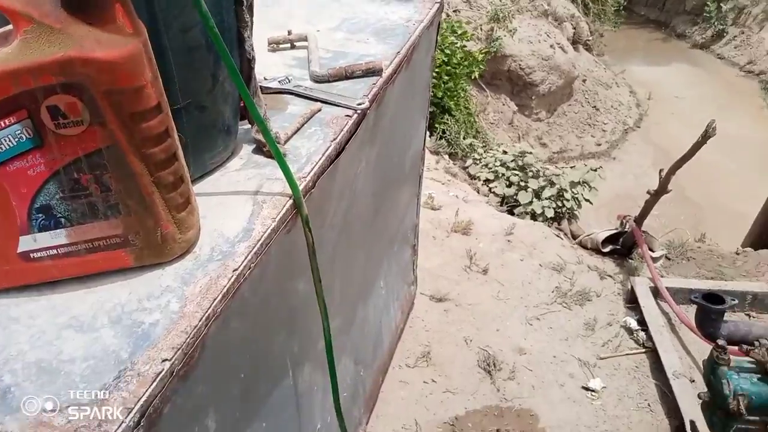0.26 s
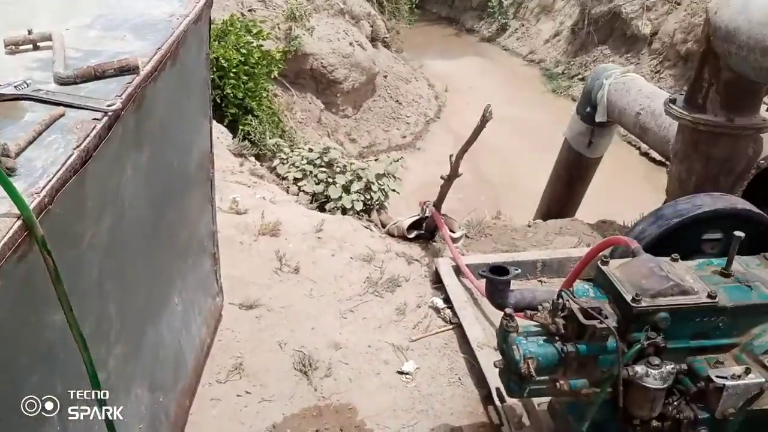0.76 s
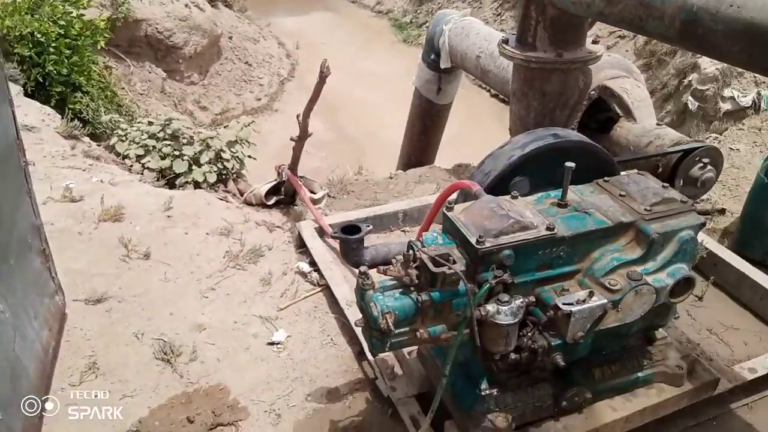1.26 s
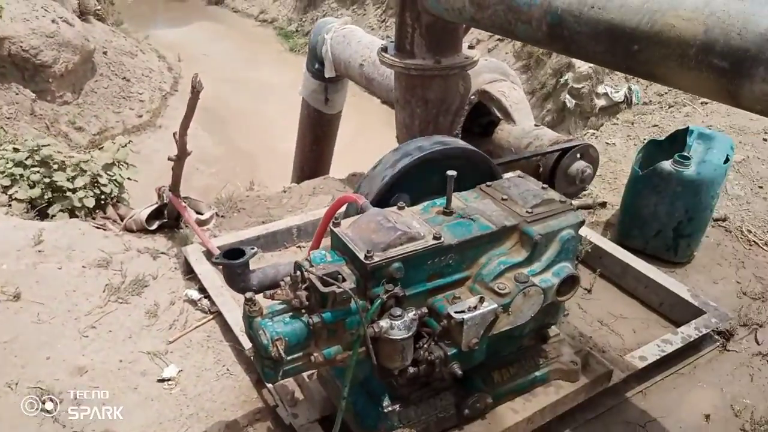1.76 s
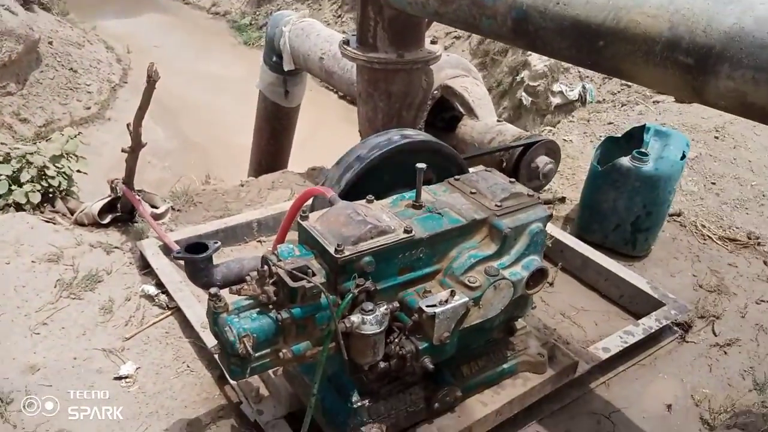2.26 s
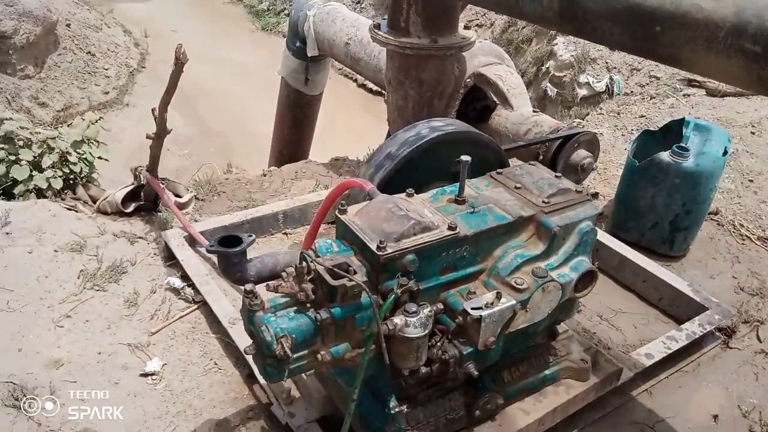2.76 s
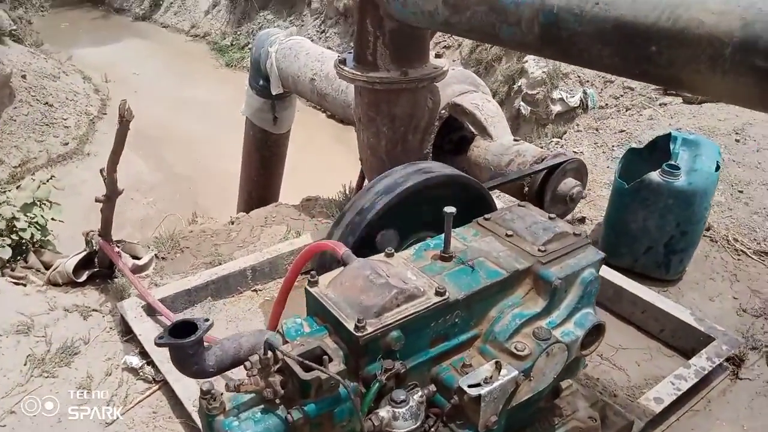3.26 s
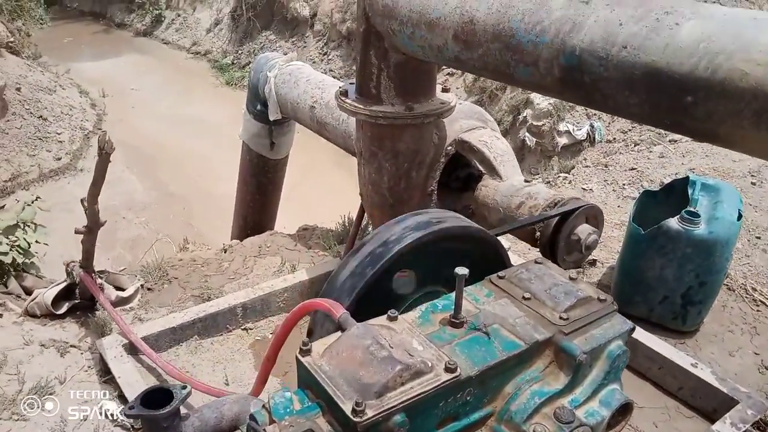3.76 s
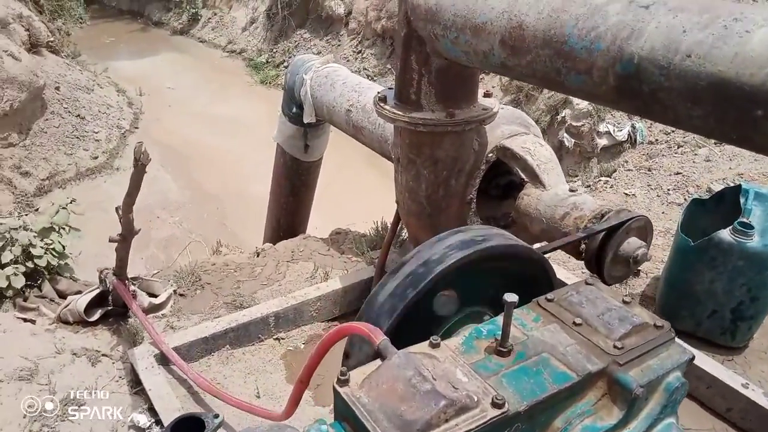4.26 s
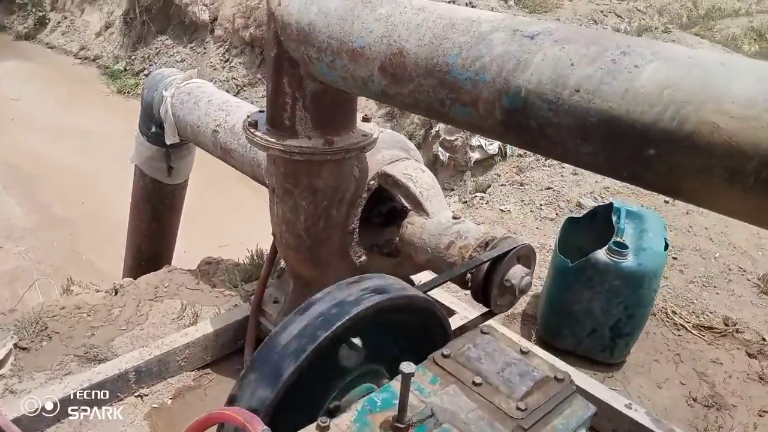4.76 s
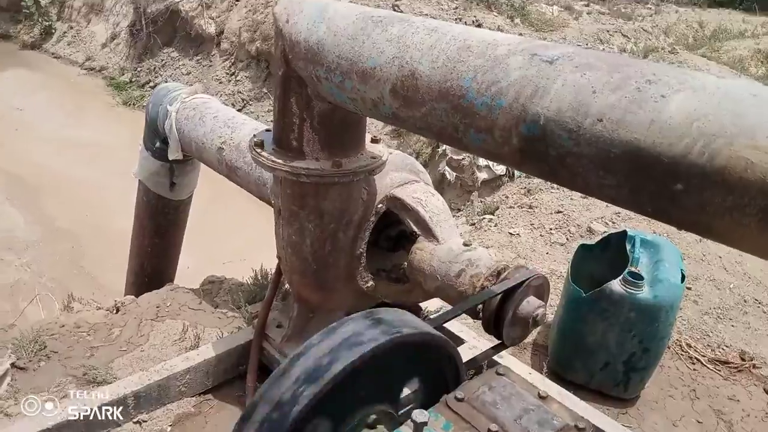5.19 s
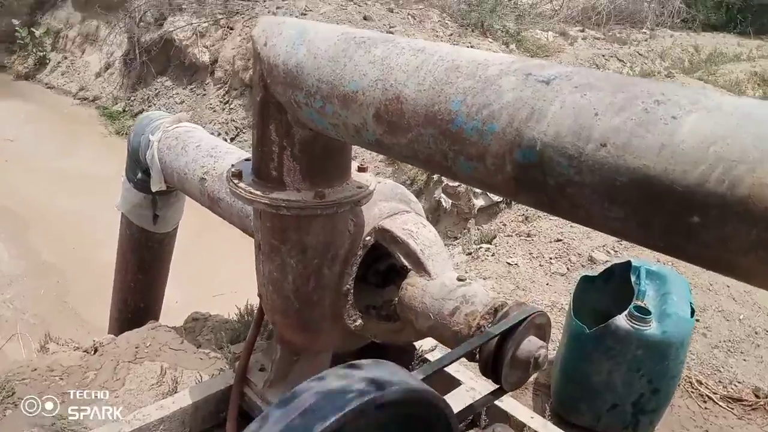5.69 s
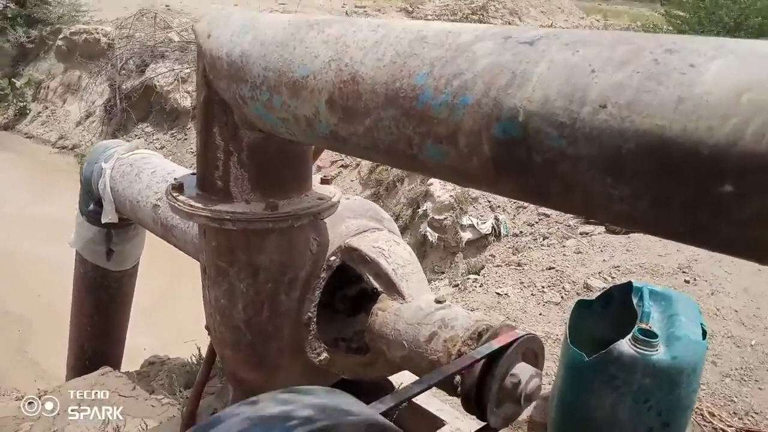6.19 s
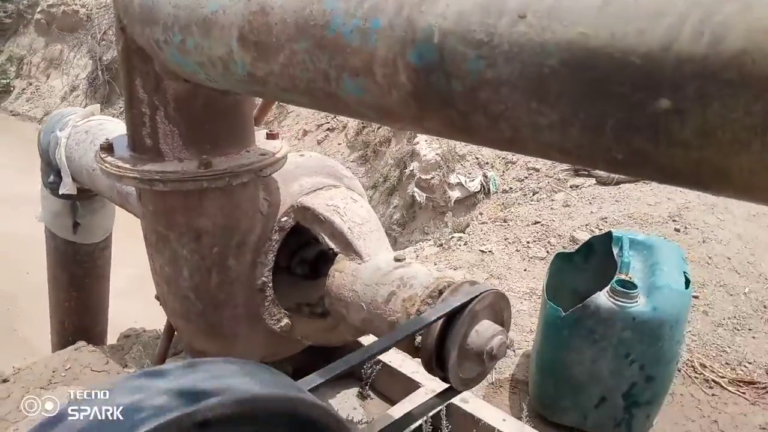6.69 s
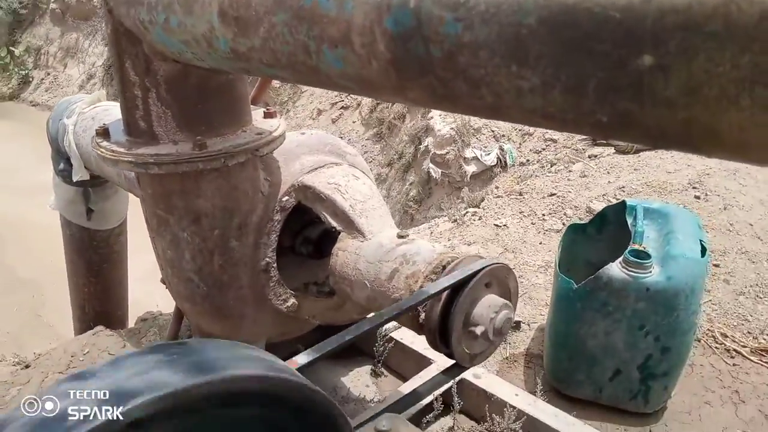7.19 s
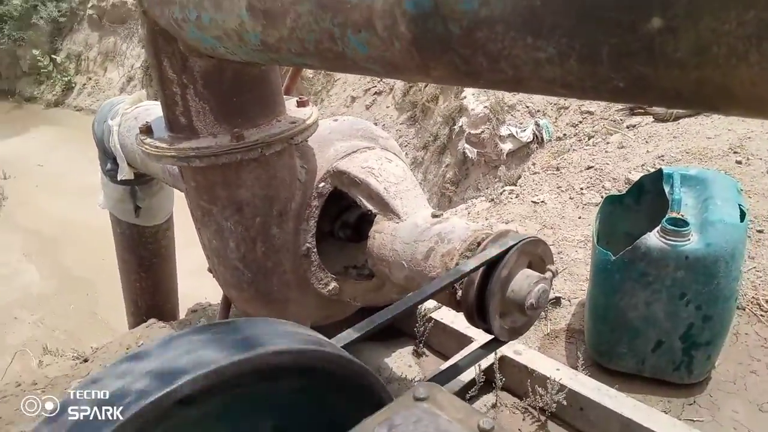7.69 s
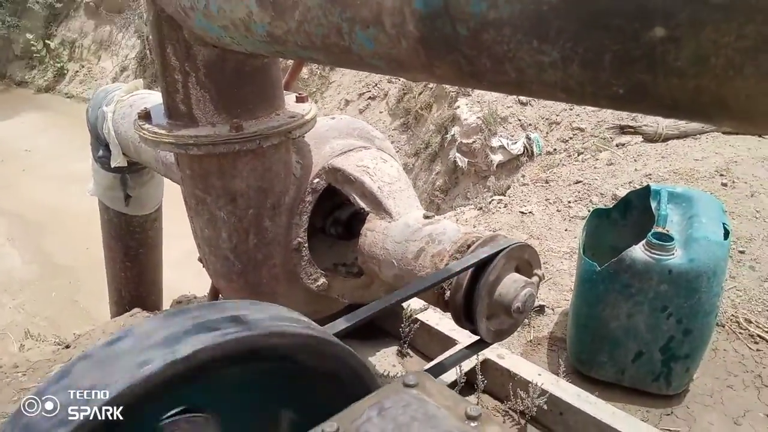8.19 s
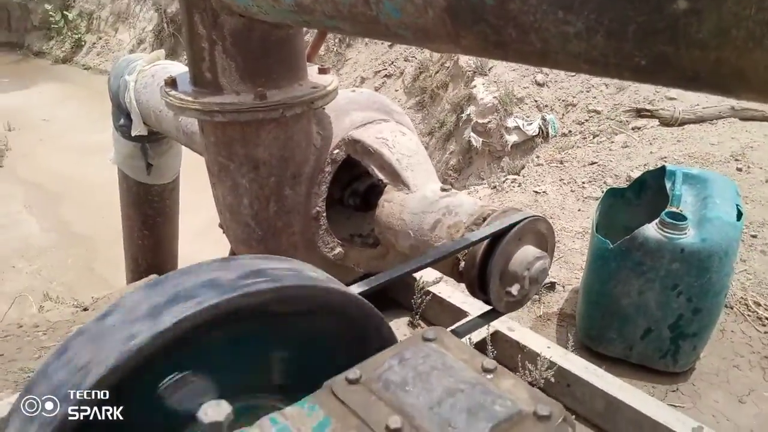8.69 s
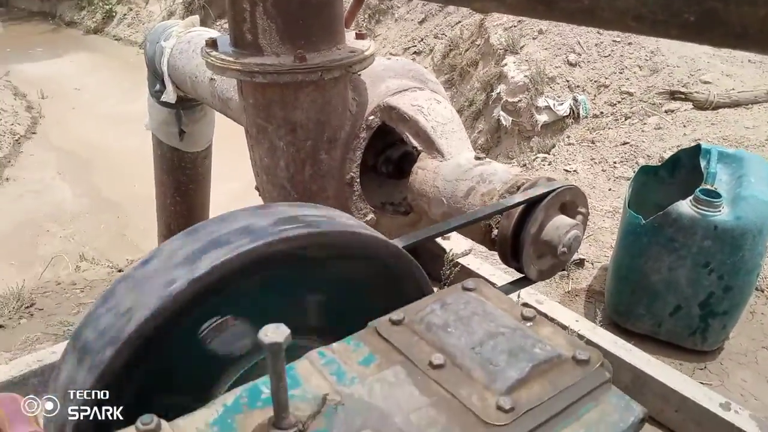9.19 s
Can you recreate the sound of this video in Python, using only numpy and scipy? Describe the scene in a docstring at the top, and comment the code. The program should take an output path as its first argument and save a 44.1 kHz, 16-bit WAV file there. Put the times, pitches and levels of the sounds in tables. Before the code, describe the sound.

From 0 to 9.5 s a single-cylinder diesel runs outdoors at an unchanging nine beats a second, heard close and dry. Every beat is a short burst of rough exhaust noise, often with a chirping whistle of differing pitch, followed within a tenth of a second by a dull knock, a ringing metallic tick and a fainter second tick. Loose sheet metal chatters continuously, surging with each beat. From 0 to 2.4 s it is loud, hissy and harsh, with lumpy wind and small air pops on the microphone. Between 2.4 and 3.3 s it turns away: blasts and rattle drop, treble dulls. Until 7.8 s low soft puffs and woody knocks stand out, with casting rings strongest around 6 s. At 7.9 s there is a low air thump and brief dip; from 8.05 s the bright, sharp blasts and rattle jump back, peaking near 8.25 s, then ease slightly and continue to the end.

```python
"""A single-cylinder diesel beats about nine times a second outdoors throughout, driving a water pump, while
sheet metal rattles; early on, wind brushes the microphone. Each beat is an exhaust blast of shaped noise
with a whistle and a low sine puff, then a knock and ringing tick from struck resonators and a second, noisy
tick. The rattle is dense clicks ringing panels, over noise. The microphone turns away and back, by level curves."""
import sys
import numpy as np
from scipy import signal
from scipy.fft import rfft, irfft, next_fast_len
from scipy.io import wavfile
from scipy.ndimage import uniform_filter1d

SR = 44100
rng = np.random.default_rng(int(sys.argv[2]) if len(sys.argv) > 2 else 0)


def elevation(decibels):
    """Turn decibel levels (scalar or array-like) into linear amplitude ratios."""
    levels = np.asarray(decibels, float)
    return 10 ** (levels / 20)


def transcribe(u):
    """Save the signal u as a 16-bit wav file named by the first command-line argument.

    u: samples, shape (n,) or (channels, n), limited to [-1, 1]; the rate is SR.
    q: integer samples, one column per channel.
    """
    v = np.clip(np.atleast_2d(u).T, -1, 1)
    q = np.round(v * 32767).astype(np.int16)
    wavfile.write(sys.argv[1], SR, q)


N = 416744

# levels as the microphone turns away from the engine and back:
# t/s, blast level/dB, puff level/dB, low rattle level/dB, high rattle level/dB
TURN = [(.1, -12, -34, -45, -30.5), (.45, -9, -43, -49, -31), (.85, -9.5, -33, -47, -31.5),
        (1.45, -8.5, -41, -44.5, -30), (2.25, -9, -36, -47.5, -29.5), (2.45, -12.5, -27.5, -30.5, -32),
        (2.75, -19.5, -37.5, -45, -40), (3.3, -23, -30.5, -43, -42.5), (4.2, -22, -23.5, -45, -43),
        (5.7, -18.5, -25, -44.5, -43), (6.45, -22.5, -23.5, -42, -42.5), (6.65, -27, -24, -43.5, -42.5),
        (7.65, -24.5, -22, -45, -43), (7.959, -33, -21, -49, -42), (8.049, -16, -33, -26.5, -28),
        (8.25, -7, -29, -40, -26), (8.75, -12, -26, -33.5, -32.5), (9.35, -13.5, -34, -32.5, -28.5)]
# treble of the blast: t/s, hiss level/dB, upper hiss level/dB, top hiss level/dB
TREBLE = [(.15, -19, -36, -21.5), (.45, -18, -29, -14.5), (1, -21, -36, -22), (1.6, -27, -23, -21.5),
          (2.2, -26, -24.5, -21.5), (2.9, -36, -32.5, -25), (3.45, -34.5, -29.5, -45),
          (3.9, -36, -37.5, -54), (4.6, -38, -41, -54), (5.5, -35.5, -63.5, -37), (6.3, -38.5, -64, -37),
          (7.2, -34.5, -56, -29.5), (7.85, -37.5, -56, -38), (7.97, -43.5, -64, -27),
          (8.15, -17.5, -35, -13), (8.7, -34, -31, -40), (9.35, -27.5, -26, -40)]
KNOCK_S, TICK_S, LATE_TICK_S = 0.03, 0.058, 0.0829   # delays after the blast


def rms_one(x):
    """Scales to rms 1."""
    return x / np.sqrt(np.mean(x ** 2) + 1e-20)


def vary(x, spread):
    """Adds a chance difference to every value."""
    return x + spread * rng.standard_normal(np.shape(x))


def at_times(s, rows):
    """Columns of a table, read at the given times."""
    times, *columns = np.transpose(rows)
    return [np.interp(s, times, c) for c in columns]


def in_time(rows):
    """Columns of a table, read at every sample."""
    return at_times(np.arange(N) / SR, rows)


def beats_s():
    """Times of all beats, from the one just before the start; the governor holds the speed nearly even."""
    # every twelfth beat: t/s
    twelfth_s = [0.0728, 1.4253, 2.7843, 4.135, 5.4857, 6.836, 8.189, 9.539]
    even = np.interp(np.arange(84), 12 * np.arange(8), twelfth_s)
    return np.r_[2 * even[0] - even[1], even]


def drift(rate_hz):
    """Slow chance, spread 1: noise through two equal one-pole low-passes, run at a fortieth of SR."""
    r = np.exp(-80 * np.pi * rate_hz / SR)
    slow = signal.lfilter([1], [1, -2 * r, r * r], rng.standard_normal(N // 40 + 2002))[2000:]
    return np.interp(np.arange(N) / 40, np.arange(len(slow)), rms_one(slow))


def band_gain(size, spectrum, low_hz, high_hz):
    """Gain per frequency bin of one band of a spectrum."""
    hz = np.arange(1, size // 2 + 2) * SR / size
    table_hz, table_db = np.transpose(spectrum)
    db = np.interp(np.log(hz), np.log(table_hz), table_db)
    return elevation(db) / np.sqrt((1 + (low_hz / hz) ** 16) * (1 + (hz / high_hz) ** 16))


def colour(x, spectrum, low_hz, high_hz):
    """One band of x, shaped by a spectrum; rms 1."""
    size = next_fast_len(N, real=True)
    return rms_one(irfft(rfft(x, size) * band_gain(size, spectrum, low_hz, high_hz), size)[:N])


def clicks(s, db):
    """A train of single clicks."""
    at, out = (np.asarray(s) * SR).astype(int), np.zeros(N)
    out[at[at < N]] = elevation(db)[at < N]
    return out


def swell(train, rise_s, fall_s):
    """Each unit click grows over the rise time to height 1 and dies away."""
    t = np.arange(int(.1 * SR)) / SR
    curve = (1 - np.exp(-(t / rise_s) ** 2)) * np.exp(-t / fall_s)
    return signal.fftconvolve(train, curve / curve.max())[:N]


def resonate(x, hz, t60):
    """A two-pole resonator: a unit click sets a decaying sine ringing, starting at height 1."""
    r, w = elevation(-60 / (t60 * SR)), 2 * np.pi * hz / SR
    return signal.lfilter([0, np.sin(w)], [1, -2 * r * np.cos(w), r * r], x + 1e-18)


def turbulence(rough_db):
    """Noise whose strength flutters within a millisecond or two."""
    return rng.standard_normal(N) * elevation(rough_db * drift(440))


def shaking():
    """How hard the sheets shake: a steady share, with surges after the blast, the tick and the late tick."""
    s = beats_s()[1:]
    high_db = at_times(s, TURN)[3]
    late_db = 8 + 0.19 * (high_db + 32)   # heard less from behind
    shake = 1 + swell(clicks(s, vary(np.full(len(s), 2.0), 2)), rise_s=0.0031, fall_s=0.039)
    shake += swell(clicks(s + LATE_TICK_S, vary(late_db, 3)), rise_s=0.0027, fall_s=0.0064)
    shake += swell(clicks(s + TICK_S, vary(np.full(len(s), -2.5), 4)), rise_s=0.0023, fall_s=0.0018)
    return shake * elevation(2 * drift(40.5))


def ringing_panels(shake):
    """Dense uneven clicks, dealt at random to loose panels that each ring at their own pitch."""
    # panel resonances: f/Hz, level/dB, t60/s
    panel_rows = [(1090, 0, .065), (1790, -1, .05), (2030, -3, .045), (2200, -3, .04), (2500, -2, .04),
                  (2980, -3, .035), (3260, -3, .035), (3600, 0, .03)]
    born = rng.random(N) < 2500 / SR   # 2500 clicks a second
    sizes = elevation(3.5 * np.minimum(rng.exponential(1, N), 4)) * rng.choice([-1, 1], N) * born * shake
    dealt = rng.integers(0, len(panel_rows), N)
    out = np.zeros(N)
    for k, (hz, db, t60) in enumerate(panel_rows):
        out += elevation(db + 3.5 * drift(9)) * resonate(sizes * (dealt == k), hz, t60)
    return out


def sheet_metal():
    """Loose panels chatter and ring with the shaking, over a low rumble."""
    # clatter and rumble spectrum: f/Hz, relative level/dB per Hz
    clatter_rows = [(35, -22), (60, -14), (208, -7.5), (497, -5.5), (600, -5.5), (1500, 0), (2190, -11.5),
                    (3850, -5), (4600, -29), (6300, -34), (7600, -49), (13400, -80), (15300, -33),
                    (16500, -52)]
    flat = [(100, 0), (16000, 0)]
    rumble_db, sizzle_over_hiss_db = -45.5, -30.5
    top_over_high_db, top_follows_hiss = -18.5, 0.22   # share of the top hiss's changes
    low_db, high_db = in_time(TURN)[2:]
    hiss_db, _, top_hiss_db = in_time(TREBLE)
    shake = shaking()
    clatter = colour(turbulence(rough_db=3.5) * shake, clatter_rows, 762, 15000)
    near = elevation(.5 * (high_db + 34))   # the ringing carries less far
    both = clatter + near * colour(ringing_panels(shake), flat, 900, 4400)
    low = colour(both, flat, 936, 1433) * elevation(low_db)
    high = colour(both, flat, 1650, 9000) * elevation(high_db)
    top_db = high_db + top_over_high_db + top_follows_hiss * top_hiss_db
    top = colour(both, flat, 12500, 16500) * elevation(top_db)
    rumble = colour(rng.standard_normal(N) * elevation(2 * drift(28)), clatter_rows, 61, 975) * elevation(rumble_db)
    sizzle = colour(turbulence(rough_db=2.5) * np.sqrt(shake), flat, 4400, 5600)
    return low + high + top + rumble + sizzle * elevation(hiss_db + sizzle_over_hiss_db)


def wind():
    """Lumpy low noise on the microphone, and single air pops of about two swings."""
    # wind at the microphone: t/s, level/dB
    gust_rows = [(0.02, -34), (0.14, -27.5), (0.25, -39.5), (0.36, -30.5), (0.52, -42.5), (0.7, -26.5),
                 (0.84, -43.5), (1.04, -31), (1.15, -60), (1.38, -43), (1.52, -57), (1.94, -54),
                 (2.06, -37), (2.4, -96), (3.41, -57), (4.09, -50), (4.28, -40), (4.45, -61)]
    # air pops on the microphone: t/s, peak level/dB, f/Hz
    pop_rows = [(1.204, -24.5, 121), (1.4297, -23, 135), (1.7677, -20.5, 248), (2.332, -20, 155),
                (2.672, -23.5, 151), (7.899, -12.5, 105)]
    calm = (gust_rows[-1][0] + .2, -90)
    level_db, = in_time(np.vstack([gust_rows, calm]))
    gusts = rng.standard_normal(N) * elevation(3 * drift(14))
    out = colour(gusts, [(50, -3), (100, 8), (170, 3.0), (350, -20)], 40, 500) * elevation(level_db)
    t = np.arange(N) / SR
    for s, db, hz in pop_rows:
        turns = np.clip((t - s) * hz, -9, 9)
        envelope = 2 / (np.exp(-turns / 0.2) + np.exp(turns / 0.69))
        out += elevation(db) * np.cos(2 * np.pi * turns - .3) * envelope
    return out


def knock_and_ring(s):
    """Parts land and sound dull low resonances; the tick then rings a casting."""
    # knock resonances: f/Hz, level/dB, t60/s, level/dB gained once the microphone faces the pump
    knock_rows = [(175, -11, .09, 5), (245, -10, .08, 7), (385, 0, .05, -12), (570, -4, .04, 4)]
    # casting resonances: f/Hz, level/dB of the blow, t60/s
    ring_rows = [(575.3, 17, 0.13), (586.5, 4.5, 0.33)]
    # strength of the valve gear: t/s, knock level/dB, ring level/dB
    gear_rows = [(.2, -53, -53), (1.1, -75, -45.5), (1.6, -40, -43), (2.2, -61, -45), (2.9, -31.5, -42),
                 (3.4, -31, -53.5), (4.8, -25.5, -49), (6.1, -22, -32.5), (7, -22.5, -44), (7.8, -22, -49),
                 (8.2, -29.5, -48), (8.7, -28.5, -40.5), (9.2, -28, -46)]
    knock_db, ring_db = at_times(s, gear_rows)
    facing_pump = np.interp(s, [5.5, 6.67], [0, 1])
    out = np.zeros(N)
    for hz, db, t60, gained_db in knock_rows:
        contact_s = vary(s + KNOCK_S, 0.001)   # the parts do not land together
        contact_db = vary(knock_db + db + gained_db * facing_pump, 3)
        out += resonate(clicks(contact_s[1:], contact_db[1:]), hz, t60)
    for hz, db, t60 in ring_rows:
        blows = clicks(s + TICK_S, vary(ring_db + db, 1.5))
        out += resonate(blows, hz, t60) - resonate(blows, hz, t60=0.08)   # builds up
    return signal.lfilter(*signal.butter(1, 1000, fs=SR), out)


def valve_gear():
    """A dull knock, a tick that rings a casting, then a later tick; the ticks are short puffs of treble noise."""
    s = beats_s()
    tick_db = at_times(s, TURN)[3] - 16.5   # under the high rattle
    ticks = clicks(s + TICK_S, vary(tick_db, 2.3))
    late = clicks(s + LATE_TICK_S, vary(tick_db - 6, 3))
    seat = clicks(s[1:] + KNOCK_S, vary(tick_db - 9, 3)[1:])   # treble of the knock
    snap = swell(ticks, rise_s=0.0032, fall_s=0.0015) + swell(late + seat, rise_s=0.0021, fall_s=0.005)
    treble = colour(turbulence(rough_db=2), [(6000, 0), (9500, -11), (15200, -2)], 4400, 16000)
    return knock_and_ring(s) + snap * treble


def gas_jet(s, t, blast_db, burst, tail):
    """A turbulent burst of ever new colour: noise in five bands, each with its own level and tail."""
    # blast spectrum: f/Hz, relative level/dB per Hz
    blast_rows = [(410, -38), (700, -18), (1050, -28), (1160, -24.5), (1790, -14.5), (2360, -7.5),
                  (3610, -5), (5020, -26), (6040, -14), (6800, -14), (7460, -22), (9000, -18),
                  (12000, -8.5), (13400, -5.5), (15200, 12.5), (15900, 26), (16500, -44)]
    hiss_db, upper_db, top_db = at_times(s, TREBLE)
    hiss_db, upper_db, top_db = vary(hiss_db, 2.5), vary(upper_db, 2.5), vary(top_db, 3.5)
    body_db = vary(-27.5 + 0.44 * blast_db, 3.0)   # the low body turns little with the microphone
    size = len(t)
    luck = rng.standard_normal((len(s), size))
    lumps = rms_one(uniform_filter1d(uniform_filter1d(luck[:, :size // 2 + 1], size=16), size=16))
    depth_db = np.linspace(7, 2, lumps.shape[1])   # eddies favour other pitches on every beat, less so up high
    ragged = elevation(3.2 * rms_one(uniform_filter1d(luck, size=64)))   # the jet stutters
    jet = rfft(rng.standard_normal((len(s), size))) * elevation(depth_db * lumps)
    core = np.abs(t) < .005   # levels are set over the middle of the burst
    out = np.zeros((len(s), size))
    # low edge/Hz, high edge/Hz, level/dB, tail level/dB
    for low, high, db, tail_db in [(915, 1450, body_db, -15), (1660, 4460, blast_db - 6.5, -16.5),
                                   (4465, 5680, hiss_db, -21.5), (8640, 11430, upper_db, -56),
                                   (12700, 14200, top_db, -26.5)]:
        noise = irfft(jet * band_gain(size, blast_rows, low, high), size)
        band = noise * (burst + elevation(tail_db) * tail) * ragged
        out += band * (elevation(db) / band[:, core].std(axis=1))[:, None]
    return out


def whistle(t, blast_db, hz, burst):
    """A sine at each beat's own pitch, swelling with the burst; it returns from a wall."""
    db = blast_db - 0.5 + 1.2 * (blast_db - uniform_filter1d(blast_db, size=5))   # strong beats whistle more
    echo = elevation(-15.0) * np.roll(burst, int(0.012 * SR))
    turns = hz[:, None] * t + rng.standard_normal((len(hz), 1))   # chance phase
    return elevation(db)[:, None] * np.sin(2 * np.pi * turns) * (burst ** 1.3 + echo)


def lay_out(s, t, sounds):
    """Adds every beat's sound at its time."""
    out = np.zeros(N + len(t))
    for at, sound in zip((s * SR).astype(int) + round(t[0] * SR), sounds):
        out[at:at + len(t)] += sound
    return out[:N]


def low_puff(s, t, puff_db):
    """A low sine rising in pitch; facing the engine again, it is shorter, higher and thinner."""
    puff_s, turned_back_s = 0.0232, 8.0   # puff length before the chance stretch
    speed = np.exp(vary(np.zeros(len(s)), 0.13)) * np.where(s > turned_back_s, 1.22, 1)
    t_puff = np.clip((t + .0012) * speed[:, None], 0, puff_s)
    envelope = np.abs(np.sin(np.pi * t_puff / puff_s)) ** .6
    swings = np.sin(2 * np.pi * (70 * t_puff + 900 * t_puff ** 2)) * envelope
    puffs = lay_out(s, t, swings * elevation(puff_db)[:, None])
    thin = signal.sosfilt(signal.butter(2, 45, "high", fs=SR, output="sos"), puffs)
    return np.where(np.arange(N) < turned_back_s * SR, puffs, thin)


def exhaust():
    """Gas leaves in a turbulent burst, whistles at a pitch of its own and pushes a low puff."""
    # beats with a clear whistle: t/s, level/dB over the blast level in TURN, whistle f/Hz
    strong_rows = [(.075, 4, 3760), (.635, 3, 2547), (1.312, 2, 3690), (2.672, 2.5, 1920),
                   (3.122, 5.5, 2570), (4.474, 2.5, 3070), (4.81, 2, 1920), (4.923, 3.5, 3300),
                   (5.149, 2, 3100), (5.486, -0.5, 1210), (6.386, 3.5, 3160), (6.499, 4.5, 1860),
                   (7.401, 3, 3250), (7.738, 3, 2050), (8.414, 1, 3710), (8.64, -0.5, 1825),
                   (8.975, 2.5, 2980), (9.202, 4.5, 3300)]
    s = beats_s()[1:]
    blast_db, puff_db = at_times(s, TURN)[:2]
    blast_db, puff_db = vary(blast_db, 1.2), vary(puff_db, 2.2)
    # other beats whistle at random below 3873 Hz
    whistle_hz = np.maximum(3873 - 800 * np.abs(rng.standard_normal(len(s))), 1000)
    for when, db, hz in strong_rows:
        k = np.argmin(np.abs(s - when))
        blast_db[k], whistle_hz[k] = at_times(when, TURN)[0] + db, hz
    uneven_s = vary(s, .0007)
    t = (np.arange(4096) - 768) / SR   # time around one beat
    opened = 1 / (1 + np.exp(-(t + 0.0045) / 0.001))   # the valve opens suddenly
    burst = 2 * opened / (np.exp(-t / 0.0021) + np.exp(t / 0.0029))
    tail = opened / (np.exp(-t / 0.0022) + np.exp(t / 0.024))
    blasts = gas_jet(s, t, blast_db, burst, tail) + whistle(t, blast_db, whistle_hz, burst)
    return lay_out(uneven_s, t, blasts) + low_puff(uneven_s, t, puff_db)


def scene():
    """Everything at the microphone; the level of gear and sheet metal dips briefly."""
    start, end, db = 7.865, 7.96, -11   # s, s, dB
    dip_db, = in_time([(start - .015, 0), (start + 0.0051, db), (end - .005, db), (end + 0.0031, 0)])
    return (elevation(dip_db) * (sheet_metal() + valve_gear()) + wind() + exhaust())[None]


def band_limit(x):
    """A steep low-pass at the top of the band."""
    return signal.sosfilt(signal.butter(12, 17140, fs=SR, output="sos"), x)


def record(dry):
    """The deepest bass is lost, peaks are rounded, the top is cut."""
    x = signal.sosfilt(signal.butter(2, 40, "high", fs=SR, output="sos"), dry)
    rounded = 0.73 * np.tanh(x / 0.9)
    mix = signal.sosfilt(signal.cheby2(12, 70, 16760, fs=SR, output="sos"), rounded)   # 70 dB down at 16760 Hz
    return band_limit(mix)


dry = scene()
out = record(dry)
transcribe(out)
```